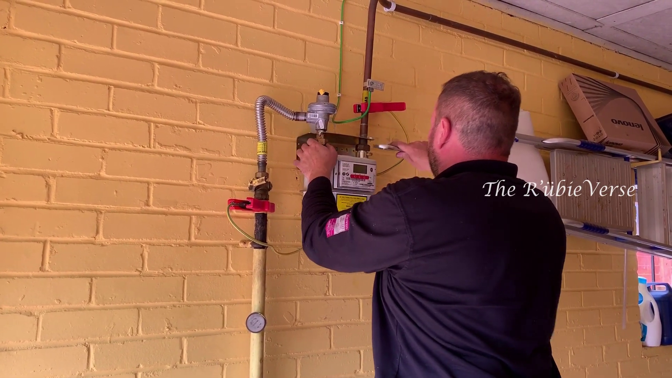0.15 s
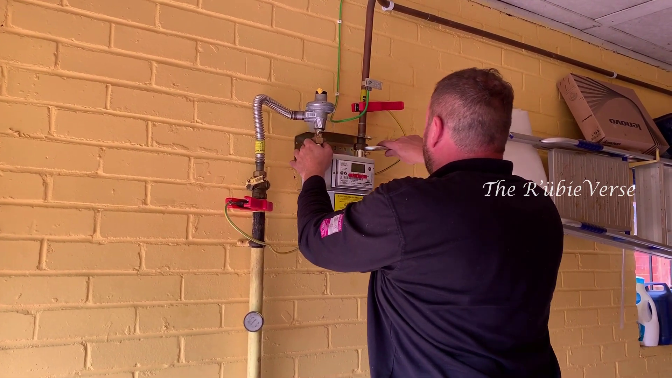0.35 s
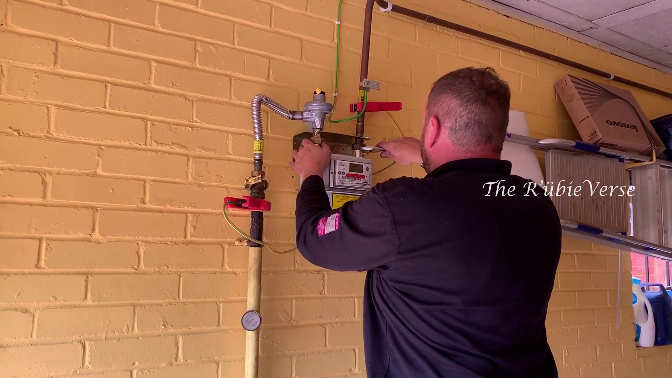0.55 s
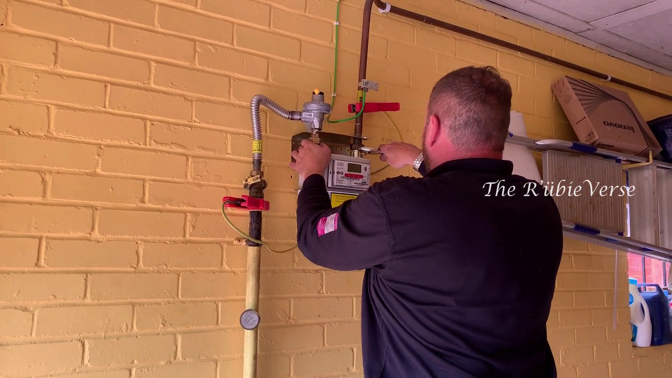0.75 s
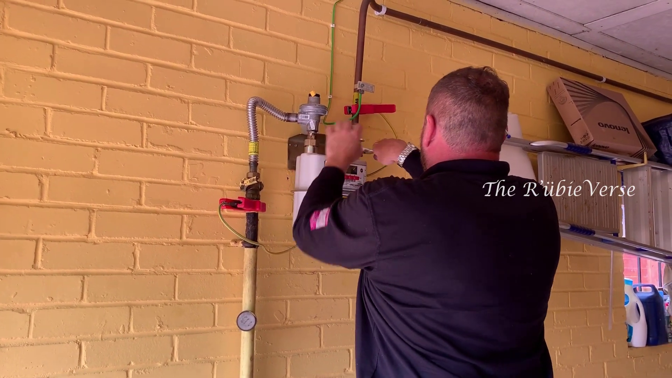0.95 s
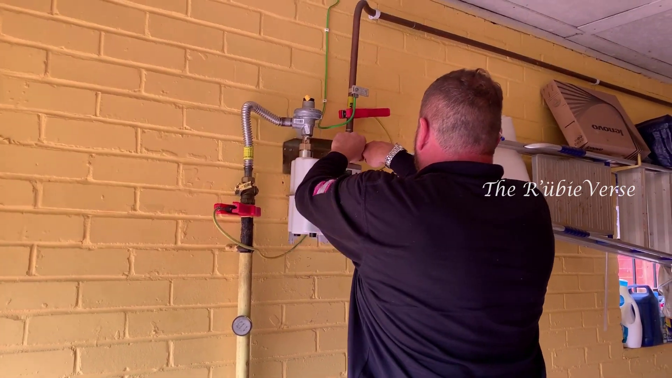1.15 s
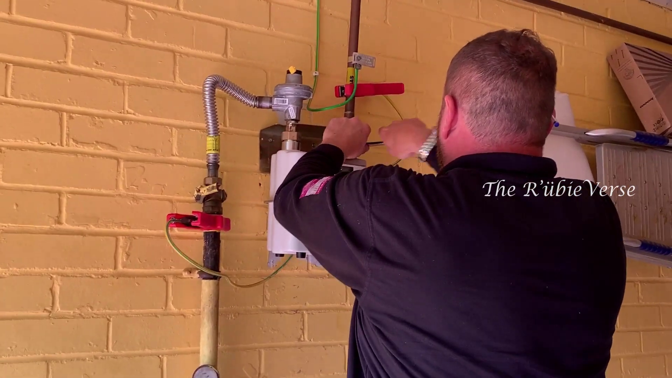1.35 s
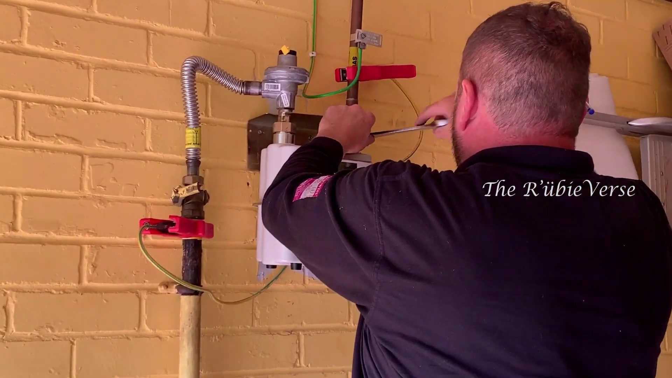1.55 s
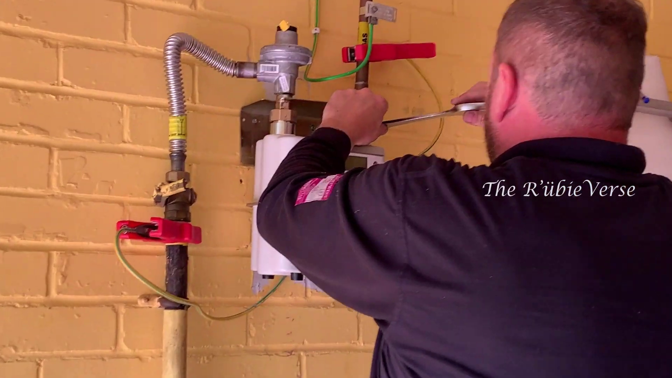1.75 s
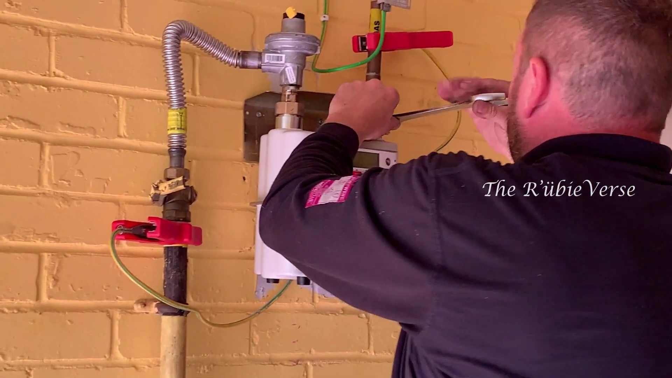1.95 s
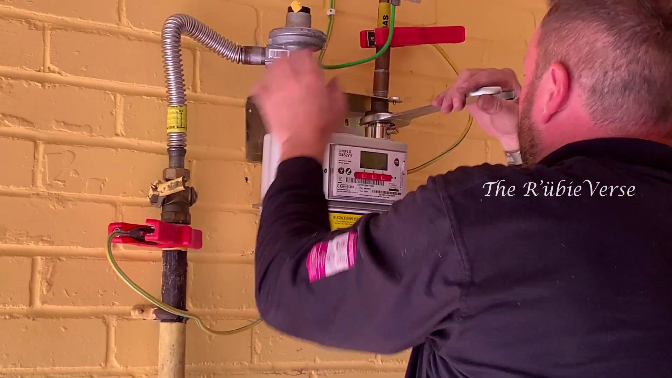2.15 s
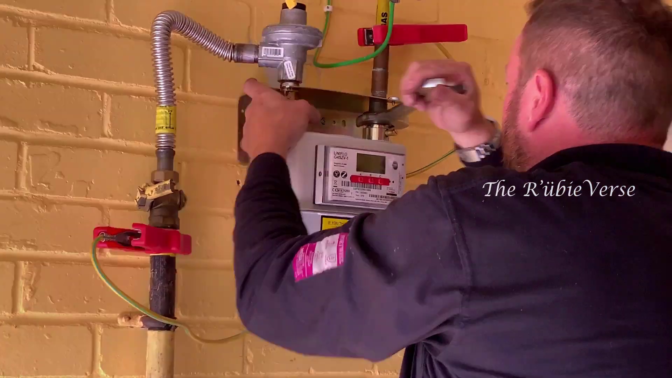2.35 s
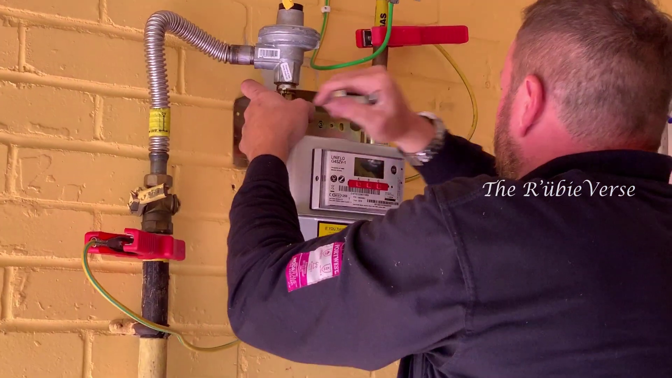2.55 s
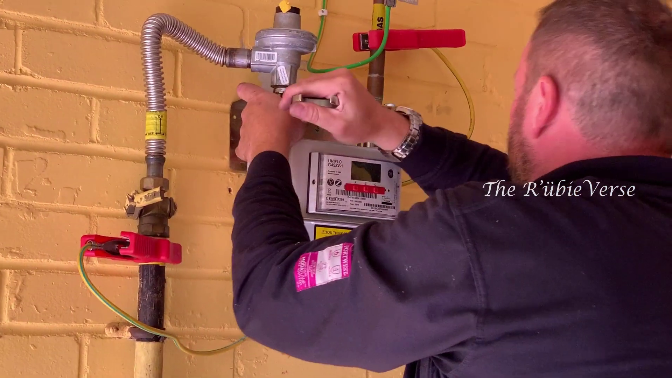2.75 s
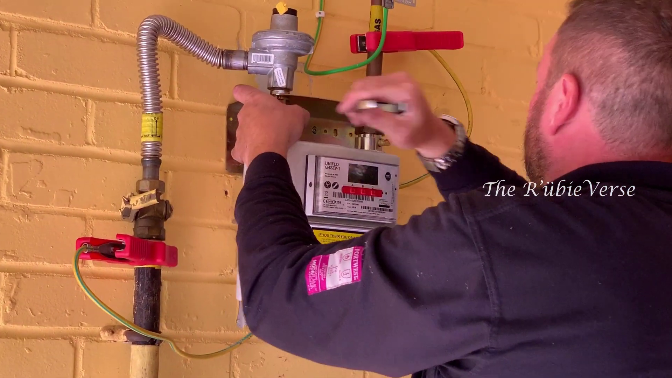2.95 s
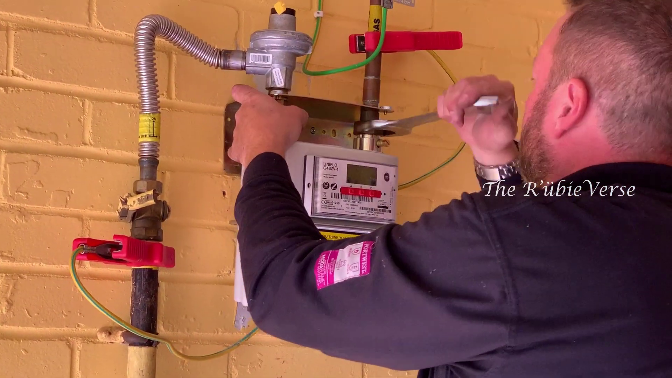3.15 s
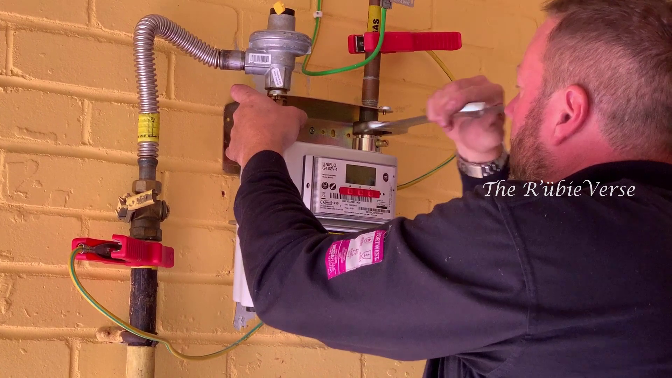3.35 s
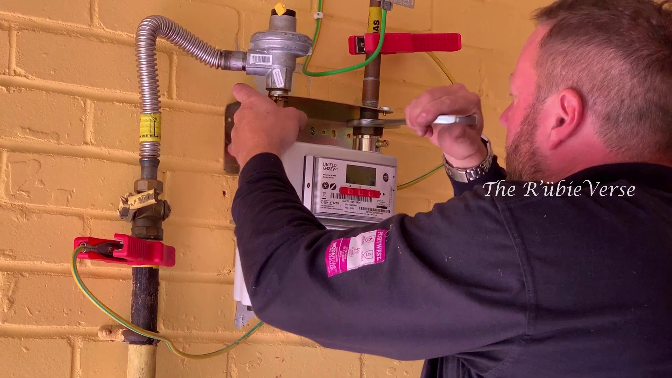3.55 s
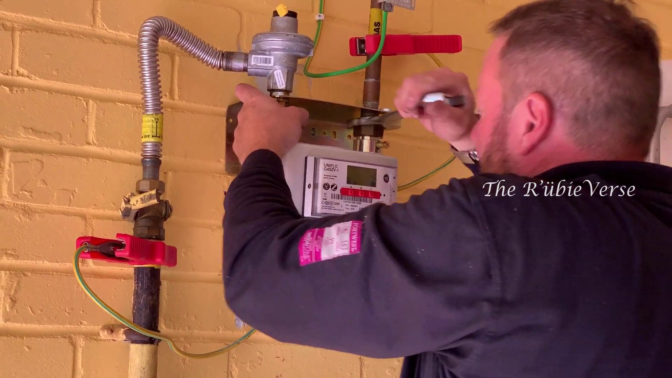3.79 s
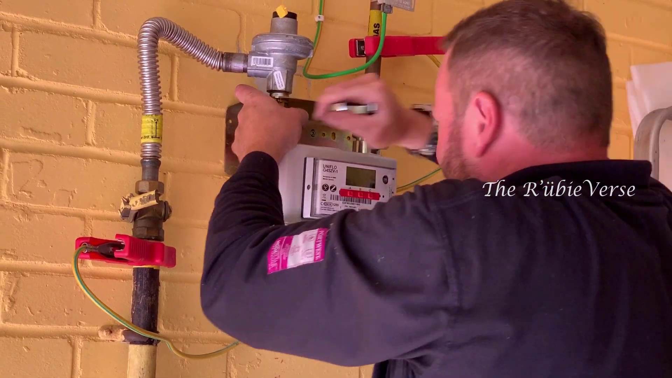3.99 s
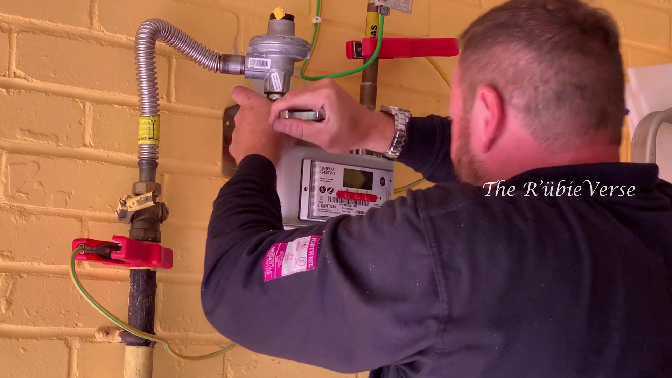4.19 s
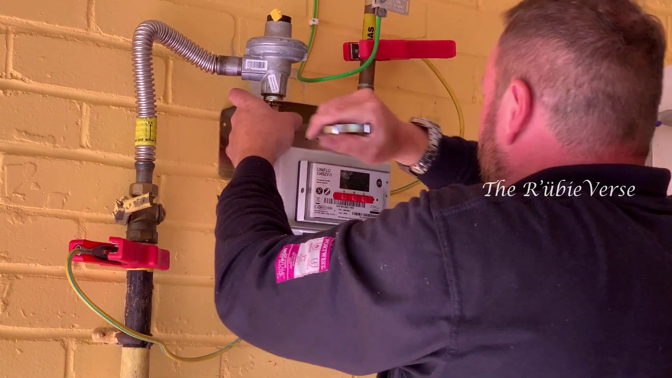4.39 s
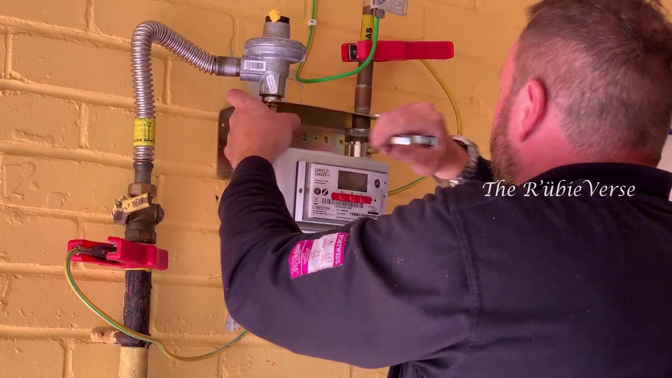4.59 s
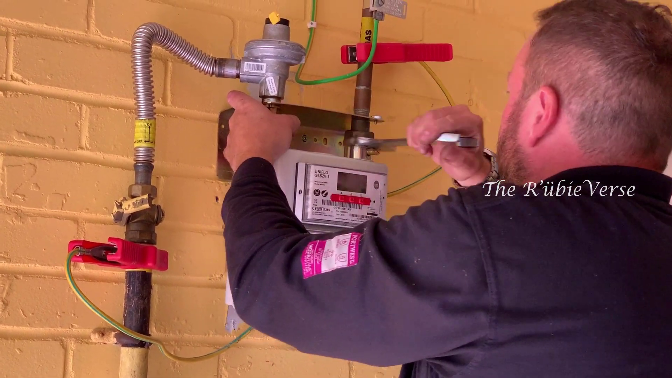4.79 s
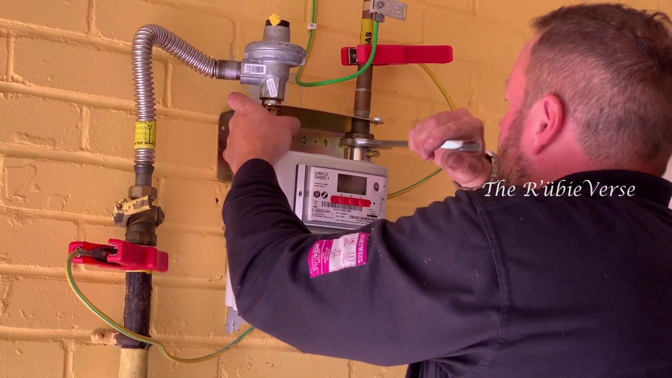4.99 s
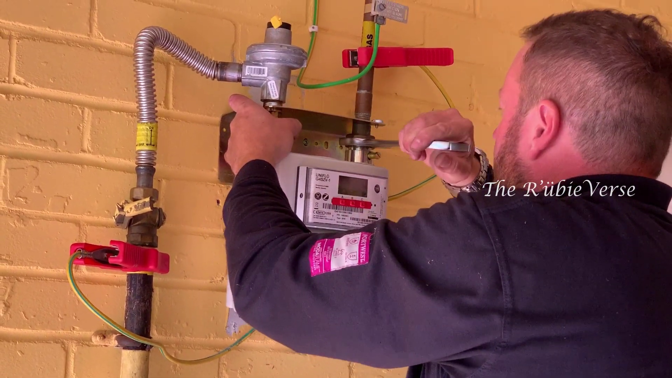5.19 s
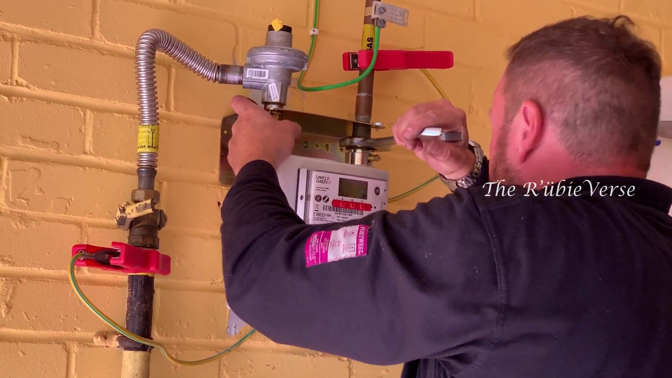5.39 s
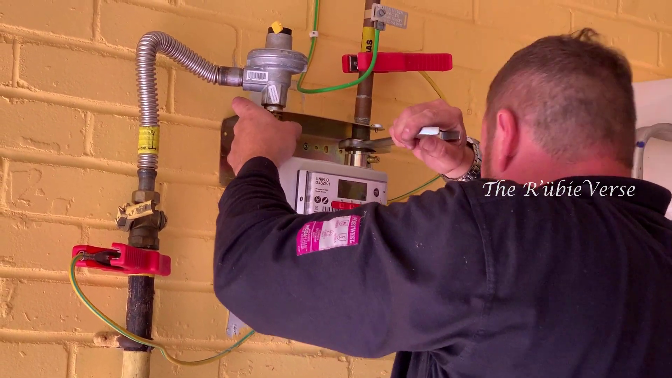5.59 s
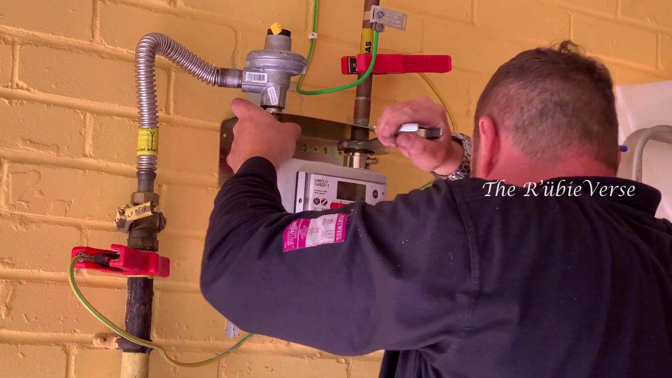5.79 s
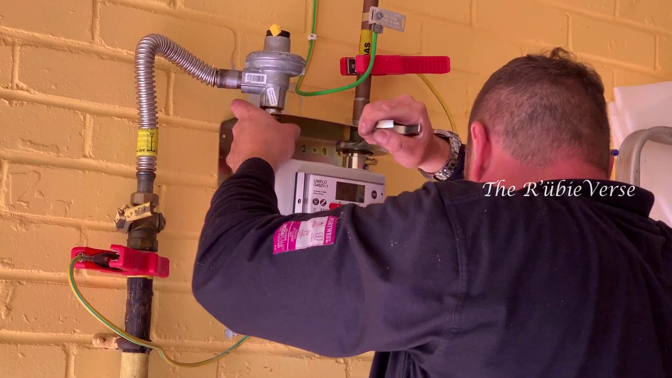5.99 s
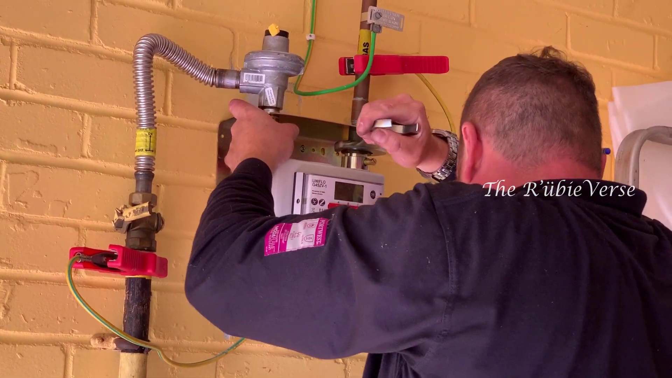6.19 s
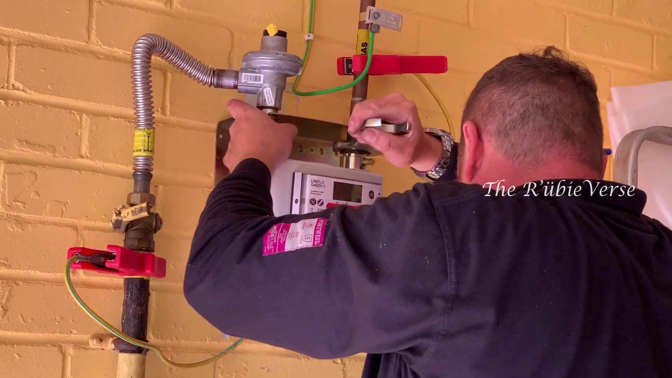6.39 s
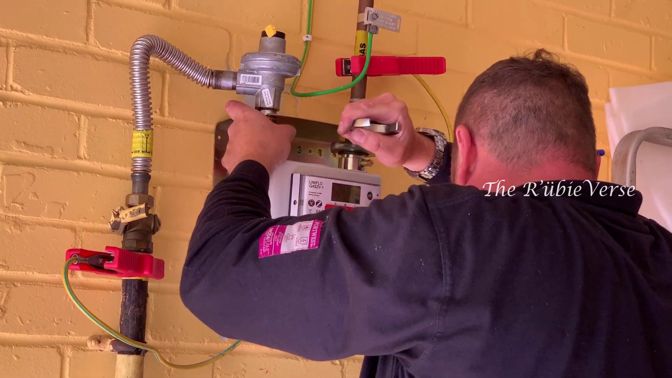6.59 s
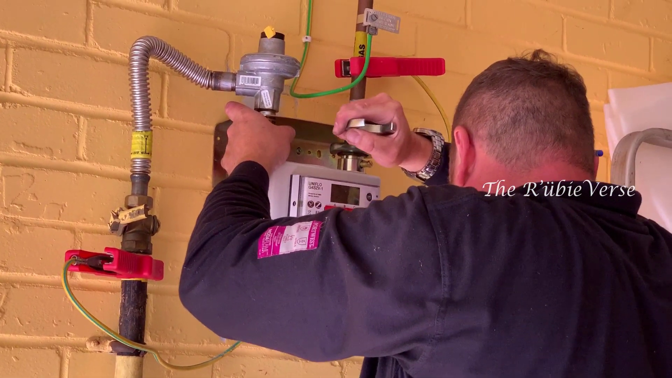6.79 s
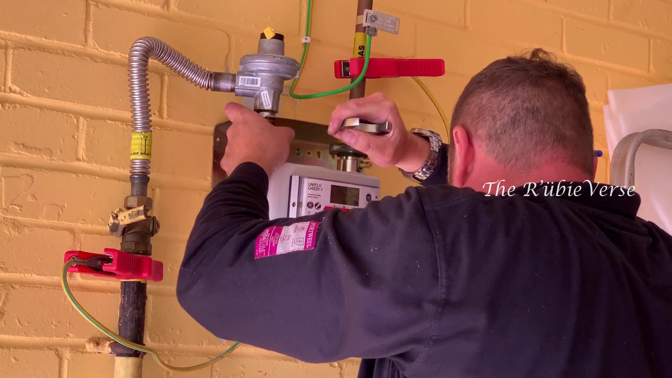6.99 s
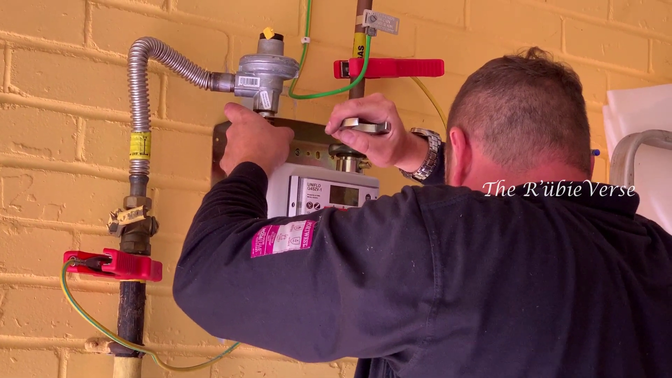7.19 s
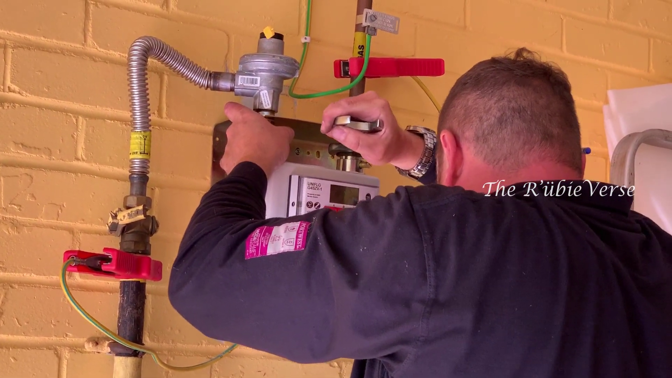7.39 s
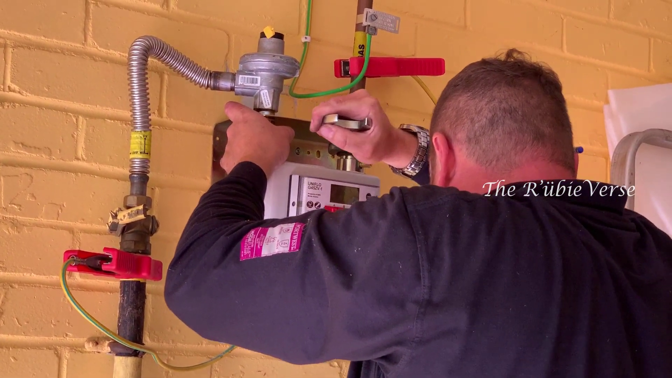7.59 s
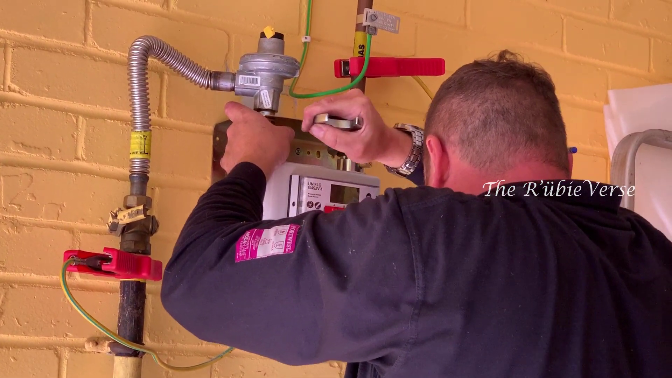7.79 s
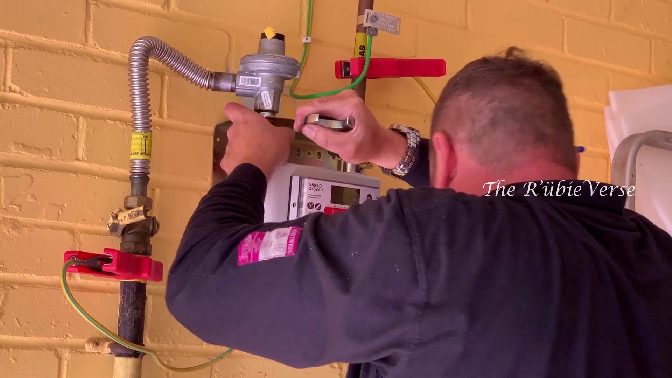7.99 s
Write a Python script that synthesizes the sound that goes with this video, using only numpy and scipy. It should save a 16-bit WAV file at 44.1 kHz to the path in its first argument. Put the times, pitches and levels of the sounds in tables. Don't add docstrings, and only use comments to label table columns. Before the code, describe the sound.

Irregular metal-on-metal knocks ring a hollow sheet-metal case and a gripped steel tool, quickly damped by hands, with short gritty scrapes leading into some blows. Sleeve rustle and soft low rumble fill the pauses. Brick walls return a short, bright echo. The final three seconds are nearly still, with small ticks, hand shifts and thin bird notes, heard through a nearby phone microphone.

```python
import sys
import numpy as np
from scipy import signal
from scipy.fft import rfft, irfft, next_fast_len
from scipy.io import wavfile
from scipy.ndimage import uniform_filter1d, map_coordinates

SR = 44100
rng = np.random.default_rng(int(sys.argv[2]) if len(sys.argv) > 2 else 0)


def bounce(signal):
    frames = np.transpose(np.atleast_2d(signal))
    limited = np.clip(frames, -1, 1)
    pcm = np.round(limited * 32767).astype(np.int16)
    wavfile.write(sys.argv[1], SR, pcm)


def invert_db(x):
    u = np.asarray(x, float) / 20
    return 10 ** u


N = 354563

# pitch_hz, level_db, t60_s
CASE_MODES = [(474, -11, .35), (540, -8, 0.21), (606, -9.5, 0.25), (673, -0.5, 0.37), (745, -0.5, 0.45),
              (810, -3, .4), (857.6, -6.5, 0.68), (906.3, -4, 0.12), (1008, -8, 0.42), (1053, -4, 0.37),
              (1168, -11, 0.11), (1310, -7, 0.34), (1414, -3.5, 0.58), (1746, -15.5, .3)]
# pitch_hz, level_db, t60_s
SPANNER_MODES = [(2350, -9, .15), (2950, -9, .18), (3300, -6, .13), (3850, -11, .18), (4300, -13, .2),
                 (4700, -14, .2), (5900, -17, .2), (6550, -15, .22), (7450, -19, .2), (7950, -16, .18),
                 (8550, -15, .18), (9300, -16, .16), (10400, -21, .16)]
# pitch_hz, level_db, t60_s
PIPE_MODES = [(59, -18, 0.12), (139, 9, 0.042), (248, -1, 0.22), (271.4, -5.5, 0.27), (364.9, -0.5, 0.15)]
# freq_hz, density_db_per_hz
PANEL_CRACK = [(120, -45.5), (220, -6.5), (400, -3), (600, 4.5), (850, -8.5), (1200, -1.5), (1700, -8.5),
               (2500, -25.5), (4000, -40), (6600, -120)]
# freq_hz, density_db_per_hz
CLANG_SPECTRUM = [(1000, -24.5), (1500, -7.5), (2300, -10.5), (3700, -12), (6600, -20), (8500, -14.5),
                  (10400, -17), (11300, -37), (12600, -16.5), (14000, -19.5), (15500, -36)]
# start_s, peak_db, spanner_db re peak, thud_db re peak, case_hz loudest
BLOWS = [(0.362, -8.5, -20.5, -30.5, 658), (0.384, -16.5, -18.5, -40.5, 710),
         (0.438, -14, -12.5, -22, 677), (0.456, -11, -8.5, -23, 520), (0.466, -9.5, -21.5, -19.5, 932),
         (0.487, -16, -29.5, -28.5, 662), (0.502, -25, -32, -27.5, 710),
         (1.013, -27, -16.5, -4.5, 700), (1.144, -5, -15, -23.5, 657), (1.176, -16.5, -23.5, -26, 789),
         (1.234, -17.5, -21.5, -19.5, 745), (1.445, -14.5, -18, -24, 886),
         (1.458, -13.5, -23, -16.5, 640), (1.865, -30, -32, -11, 480), (2.944, -24, -24.5, -12, 880),
         (3.09, -17, -12.5, -23.5, 790), (3.133, -8.5, -12, -13, 901), (3.282, -20, -25.5, -24.5, 660),
         (3.511, -3.5, -10.5, -22.5, 712), (3.52, -5, -18, -21.5, 885), (4.554, -9, -20.5, -20, 743),
         (4.638, -18.5, -14.5, -35, 814), (4.66, -7, -14.5, -27, 808), (4.88, -6, -30.5, -21.5, 685),
         (5.08, -8.5, -30.5, -17, 633)]
# start_s, peak_db, spanner_db re peak, case_hz loudest
MORE_BLOWS = [(0.001, -42, -23.5, 1120), (0.935, -41, -15.5, 660), (1.214, -18.5, -21.5, 760),
              (1.268, -27.5, -21.5, 750), (1.314, -28, -20.5, 830), (1.611, -32.5, -29, 1090),
              (2.103, -44.5, -17, 850), (2.36, -41, -10.5, 967), (2.908, -29, -20, 770),
              (2.936, -32.5, -16.5, 860), (4.654, -19, -11, 828), (4.576, -19.5, -24, 720),
              (3.305, -35, -30.5, 680), (3.44, -31.5, -35.5, 860), (3.461, -28, -27, 715),
              (3.471, -31, -20.5, 816), (4.447, -33, -17, 920), (5.11, -24, -26, 760),
              (5.124, -29, -21.5, 715), (4.562, -11, -25.5, 800), (4.605, -23, -24, 910),
              (4.668, -16.5, -19.5, 900), (4.674, -17.5, -21, 750), (3.163, -17, -20, 885),
              (3.175, -21.5, -22, 740), (3.569, -19, -26, 900), (.394, -25, -25, 698),
              (4.906, -29, -27, 800), (5.364, -44.5, -23, 614)]
# start_s, peak_db, spanner_db re peak, spanner_hz loudest
JAW_TICKS = [(0.639, -53.5, 3, 8000), (0.779, -63, 5, 13000), (0.824, -38.5, -34, 8100),
             (0.849, -40.5, -19, 8940), (2.284, -46, -4.5, 8100), (2.75, -44.5, -0.5, 3630),
             (4.215, -37.5, -31.5, 2390), (4.391, -32.5, 5, 4730), (4.401, -20.5, -4, 2060),
             (4.879, -28, -1, 8970), (5.669, -31, -15.5, 1497), (6.289, -36.5, -24.5, 1935),
             (6.635, -39, -16.5, 1690), (7.472, -37.5, -15, 1680)]
# start_s, length_s, first_db, last_db, spanner_db re case
JAW_RUBS = [(0.812, 0.21, -66.5, -46.5, -11.5), (1.006, 0.098, -31, -38.5, -16.5),
            (1.1, 0.053, -47, -32, -9), (1.424, 0.019, -56, -33, -9), (2.864, 0.083, -54, -31, -12.5),
            (3.416, 0.088, -48, -31, -12.5), (4.331, 0.035, -52, -41.5, -9.5),
            (4.367, 0.038, -43.5, -30.5, 9), (0.338, 0.031, -64.5, -27.5, -9),
            (4.534, 0.02, -59.5, -28, -13), (4.619, 0.029, -35.5, -28, -8), (4.834, 0.039, -51, -33.5, -8),
            (5.069, 0.014, -48, -23, 1)]
# start_s, level_db, pitch_hz, t60_s
SPANNER_TONES = [(0, -68, 1000, 2.5), (0, -62, 5080, .2), (.04, -67, 4250, .3), (2.135, -61, 1420, .25),
                 (2.295, -55, 1030, .12), (2.365, -54, 1030, .16), (2.42, -58, 1030, .14),
                 (1.34, -61, 4740, .9), (.41, -52, 6600, .2), (.933, -55, 6300, .2), (.933, -57, 5200, .2),
                 (.933, -52, 2900, .2), (2.915, -60, 6600, .4), (3.282, -62, 8700, .12),
                 (3.512, -40, 6550, .3), (4.42, -36, 2230, .2), (4.398, -32, 1600, .08),
                 (4.895, -36, 3300, .15), (.362, -33, 2450, .08), (.454, -32, 2500, .07),
                 (.462, -36, 4700, .06), (.476, -32, 2850, .2), (1.012, -52, 3300, .2),
                 (1.447, -58, 4750, .3), (1.5, -56, 3280, .25), (1.447, -47, 3300, .25),
                 (1.78, -76, 4620, .6), (2.87, -60, 1020, .2), (2.936, -40, 2350, .15),
                 (2.942, -35, 1015, .4), (3.09, -29, 3200, .04), (3.133, -23, 3250, .04),
                 (4.554, -22, 3150, .035), (4.655, -23, 3050, .05), (5.08, -30, 3150, .05),
                 (4.636, -36, 2330, .3), (3.135, -30, 2350, .15), (1.065, -53, 2280, .2),
                 (.935, -52, 2250, .25)]
# start_s, level_db, pitch_hz, free_s
PANEL_TONES = [(.378, -19, 673, 0.045), (.38, -23.5, 824.5, 0.02), (.37, -27.5, 1413, 0.0088),
               (.452, -23, 469.6, .03), (.462, -23, 911, 0.044), (.478, -18, 673, 0.032),
               (.535, -28.5, 673, 0.025), (1.03, -34.5, 680, .075), (1.03, -38, 909, 0.059),
               (1.146, -21.5, 680, 0.029), (1.146, -21.5, 811, 0.042), (1.168, -30, 1424, 0.027),
               (1.146, -24.5, 548, 0.039), (1.235, -30.5, 830, 0.053), (1.448, -36, 673, 0.18),
               (1.448, -33.5, 540, .05), (2.945, -38, 248, 0.046), (3.136, -28, 673, 0.027),
               (3.136, -25.5, 837.3, 0.063), (3.136, -26, 1067, 0.047), (3.138, -27.5, 243.5, 0.037),
               (3.514, -21.5, 743.3, 0.031), (3.46, -33.5, 810, 0.029), (3.514, -20.5, 911, 0.057),
               (3.516, -27, 605.4, 0.044), (3.522, -23, 1443, .068), (3.518, -29, 1723, 0.065),
               (4.358, -29.5, 840.4, .135), (4.395, -23, 2224, 0.019), (4.556, -23.5, 736, 0.051),
               (4.556, -26.5, 911.3, 0.041), (4.556, -27.5, 360.8, 0.046), (4.556, -25.5, 1443, 0.056),
               (4.662, -20, 751.4, 0.033), (4.68, -24.5, 682, 0.041), (4.883, -17.5, 805, 0.034),
               (4.885, -22.5, 673, 0.049), (4.882, -26.5, 540, 0.037), (5.082, -24.5, 751.6, 0.029),
               (5.082, -23.5, 609.3, 0.036), (5.084, -30, 1464, 0.057), (5.082, -26.5, 477.6, .04),
               (5.138, -37, 800, 0.0099), (5.15, -36, 599, .06)]
# start_s, length_s, rub_db, hiss_db
SLEEVE_STROKES = [(-.1, 0.11, -61, -70), (.07, 0.066, -75, -69), (0.616, 0.044, -75, -61.5),
                  (.72, 0.24, -75, -71.5), (1.29, 0.18, -61.5, -57), (1.45, 0.3, -89, -85),
                  (1.62, 0.4, -76, -93), (1.85, 0.055, -78, -73), (2.08, 0.038, -67, -72),
                  (2.27, 0.051, -60.5, -62.5), (2.25, 0.41, -64.5, -73.5), (3.17, 0.13, -81, -65),
                  (3.7, 0.49, -69, -74.5), (5.22, 0.27, -69, -73)]
# freq_hz, density_db_per_hz
CLOTH_SPECTRUM = [(1000, -0.5), (1800, -4), (2300, 0), (2800, -9.5), (3700, -2), (4700, -5), (6200, -16),
                  (8000, -54)]
# freq_hz, density_db_per_hz
FIBRE_SPECTRUM = [(3650, -52.5), (6200, -8.5), (8270, -4.5), (10600, -8.5), (11700, -44), (12400, -11),
                  (13500, -2), (15200, -18)]
# start_s, length_s, level_db
PALM_STROKES = [
    (1.87, 0.037, -44.5),
    (6.86, 0.18, -65),
    (7.26, 0.13, -63),
    (7.55, 0.18, -62.5),
    (7.97, 0.11, -68),
    (7.755, 0.03, -57),
]
# freq_hz, density_db_per_hz
PALM_SPECTRUM = [(150, -22), (300, 0.5), (500, 1.5), (780, -7), (1000, -23), (1600, -120)]
# time_s, pitch_hz
BIRD_WHISTLES = [
    [(0, 6930), (.13, 6920), (.23, 6750), (.28, 6500), (.35, 5650)],
    [(1.85, 5900), (1.9, 6800), (2.02, 7200), (2.1, 6600), (2.2, 6260), (2.28, 6600)],
]
# start_s, length_s, first_hz, last_hz, level_db
BIRD_GLIDES = [
    (5.793, 0.11, 5350, 5490, -91),
    (6.74, .03, 4650, 4410, -89),
    (6.923, 0.017, 4470, 4280, -83),
    (6.943, 0.02, 3960, 3680, -69.5),
    (6.966, 0.059, 3360, 3040, -80.5),
    (7.975, 0.063, 5800, 6600, -87),
]
# time_s, level_db
RUMBLE_LEVEL = [(0, -53.5), (.58, -66.5), (.8, -63), (1.17, -42.5), (1.38, -57.5), (2.75, -66.5),
                (3.15, -49.5), (3.4, -46.5), (3.6, -44.5), (4.01, -58.5), (4.66, -53.5), (5.3, -54.5),
                (6.34, -62), (7.37, -55.5), (7.79, -60.5), (8.04, -58.5)]
# freq_hz, density_db_per_hz
RUMBLE_SPECTRUM = [(12, -29), (20, -1.5), (43, 3), (86, -2), (113, -6), (161, -21.5), (220, -12.5),
                   (290, -40), (480, -120)]
# time_s, level_db
TRAFFIC_LEVEL = [(0, -82), (.3, -67.5), (.75, -61.5), (1.75, -60.5), (2.2, -66), (2.65, -65.5), (3.9, -64),
                 (4.15, -63.5), (5.45, -59), (5.9, -62), (6.2, -63), (6.55, -64.5), (7, -65), (7.4, -66),
                 (7.7, -69), (8.04, -69)]
# freq_hz, density_db_per_hz
TRAFFIC_SPECTRUM = [(71, -41.5), (120, -10.5), (226, -6.5), (404, -6.5), (521, -9), (731, -12),
                    (1150, -13.5), (1990, -21), (2320, -29), (3500, -39), (4550, -65.5), (7700, -120)]
# freq_hz, density_db_per_hz
HISS_SPECTRUM = [(900, -34.5), (1500, -10.5), (2300, -17), (3000, -25), (4500, -16.5), (6500, -23.5),
                 (10500, -19), (13500, -23.5), (15500, -52.5)]
# freq_hz, t60_s
WALL_T60 = [(100, 0.93), (260, 0.3), (700, 0.41), (1840, 0.35), (4850, 0.34), (12800, 0.25)]
# freq_hz, likeness_0_to_1
WALL_LIKENESS = [(60, 1), (180, 0.93), (550, 0.29), (1650, 0.11), (4970, 0.17), (15000, 0.8)]
# freq_hz, likeness_0_to_1
AIR_LIKENESS = [(60, .98), (240, .92), (950, .5), (3800, .4), (15000, .5)]
# freq_hz, phase_rad
PORT_PHASE = [(100, 0.15), (500, 0.2), (2000, 1.0), (4000, 1.5), (8000, 1.35), (13000, 1.2)]


def unit(x):
    return x / np.sqrt(np.mean(x ** 2) + 1e-20)


def along(points, hz):
    f, v = np.transpose(points)
    return np.interp(np.log(hz + 1), np.log(f + 1), v)


def curves(rows):
    s, *cols = np.transpose(rows)
    return [np.interp(np.arange(N) / SR, s, c) for c in cols]


def wobble(knots_per_s):
    knots = rng.standard_normal(int(N * knots_per_s / SR) + 4)
    return map_coordinates(knots, [np.arange(N) * knots_per_s / SR])


def wander(t, knots_per_s, knots):
    return map_coordinates(rng.standard_normal((2, knots)), [[[0], [1]] + 0 * t, [knots_per_s * t] * 2],
                           mode="mirror")


def filtered(x, response):
    m = next_fast_len(N + 8192)
    return irfft(rfft(x, m) * response(np.fft.rfftfreq(m, 1 / SR)), m)[..., :N]


def paired(z, hz, likeness):
    turn = np.arccos(np.clip(along(likeness, hz), -1, 1))[:, None] / 2
    mid = np.cos(turn) * z[..., 0, :, :]
    side = np.sin(turn) * z[..., 1, :, :]
    return np.stack([mid + side, mid - side], axis=-3)


def rush(spectrum, patchy_db):
    hz, _, z = signal.stft(rng.standard_normal((2, N)), SR, nperseg=1024)
    field = uniform_filter1d(rng.standard_normal(z.shape[1:]), size=8, axis=0)
    field = uniform_filter1d(field, size=5, axis=1)
    z = paired(z, hz, AIR_LIKENESS) * invert_db(patchy_db * unit(field))
    patchy = signal.istft(z, SR, nperseg=1024)[1][:, :N]
    return unit(filtered(patchy, lambda f: invert_db(along(spectrum, f))))


def tails(count):
    hz, t, z = signal.stft(rng.standard_normal((count, 2, SR // 2)), SR, nperseg=256)
    z = paired(z, hz, WALL_LIKENESS) * invert_db(-60 * t / along(WALL_T60, hz)[:, None])
    tail = signal.istft(z, SR, nperseg=256)[1]
    tail_s = np.arange(tail.shape[-1]) / SR
    tail *= 1 - np.exp(-tail_s / 0.00063)
    tail *= invert_db(3.2 * (tail_s < 0.07))
    return tail / np.sqrt(np.sum(tail ** 2, axis=(1, 2), keepdims=True) / 2)


def street():
    rumble = invert_db(curves(RUMBLE_LEVEL)[0] + 0.38 * wobble(2.4)) * rush(RUMBLE_SPECTRUM, patchy_db=0.9)
    traffic = invert_db(curves(TRAFFIC_LEVEL)[0] + 0.48 * wobble(2.7)) * rush(TRAFFIC_SPECTRUM, patchy_db=3.5)
    hiss = invert_db(-81.5) * rush(HISS_SPECTRUM, patchy_db=0.8)
    return rumble + traffic + hiss


def strokes(rows):
    swell_share, fade_s = 0.39, 0.14
    t = np.arange(N) / SR
    s, length, *dbs = np.transpose(rows)[:, :, None]
    swell = (t - s) / (swell_share * length)
    fade = 1 + (s + length - t) / fade_s
    shape = np.clip(np.minimum(swell, fade), 0, 1) ** 2
    return [np.sum(invert_db(db) * shape, axis=0) for db in dbs]


def sleeve():
    rub, hiss = strokes(SLEEVE_STROKES)
    palm, = strokes(PALM_STROKES)
    rustle = rub * rush(CLOTH_SPECTRUM, patchy_db=3.5)
    rustle = rustle + hiss * rush(FIBRE_SPECTRUM, patchy_db=2.5)
    rustle = rustle + palm * rush(PALM_SPECTRUM, patchy_db=-5.0)
    return invert_db(1.5 * wobble(30)) * rustle


def singing():
    out, t = np.zeros(N + SR), np.arange(SR) / SR
    for s, db, hz, t60_s in SPANNER_TONES:
        grip = wander(t, knots_per_s=55, knots=44)
        tone = np.sin(2 * np.pi * hz * t + 1.6 * grip[0])
        envelope = invert_db(db - 60 * t / t60_s + 1.8 * grip[1]) * (1 - np.exp(-t / 0.0015))
        out[round(s * SR):][:SR] += envelope * tone
    return out[:N]


def sounding(rows, fade_s):
    t = np.arange(N) / SR
    return np.clip(np.minimum(t - rows[0][0], rows[-1][0] - t) / fade_s + 0.5, 0, 1)


def bird_note(rows, flutter):
    hz, db = curves(rows)
    phase = 2 * np.pi * np.cumsum(hz * flutter) / SR
    return invert_db(db + 3.0) * sounding(rows, fade_s=0.01) * np.sin(phase)


def birds():
    out = np.zeros(N)
    for rows, db, change_db in zip(BIRD_WHISTLES, [-72, -79], [-10.5, 0]):
        first_s, last_s = rows[0][0], rows[-1][0]
        whistle = [(s, hz, db + change_db * (s - first_s) / (last_s - first_s)) for s, hz in rows]
        out += bird_note(whistle, flutter=1)
    flutter = 1 + 0.015 * wobble(450)
    for s, length_s, first_hz, last_hz, db in BIRD_GLIDES:
        out += bird_note([(s, first_hz, db), (s + length_s, last_hz, db)], flutter)
    return invert_db(1.8 * wobble(31)) * out


def ring(modes, t, loudest_hz, focus_db, damping, scatter_db, detune, spot_db=0):
    hz, db, t60_s = np.transpose(modes + [(loudest_hz, spot_db, 0.2)])[:, :, None]
    hz = hz * (1 + detune * rng.standard_normal(hz.shape))
    db = db + scatter_db * rng.standard_normal(db.shape)
    db = db - focus_db * np.abs(np.log2(hz / loudest_hz))
    tones = np.sin(2 * np.pi * (hz * t + rng.random(hz.shape)))
    x = np.sum(invert_db(db - 60 * t / (damping * t60_s)) * tones, axis=0)
    x *= 1 - np.exp(-(t / 0.0011) ** 2)
    return x / np.max(np.abs(x))


def burst(spectrum, t, t60_s, centre_hz, focus_db):
    hz = np.fft.rfftfreq(len(t), 1 / SR) + 1
    colour = invert_db(along(spectrum, hz) - focus_db * np.abs(np.log2(hz / centre_hz)))
    noise = unit(irfft(rfft(rng.standard_normal(len(t))) * colour, len(t)))
    return noise * invert_db(-60 * t / t60_s) * (1 - np.exp(-t / (0.026 * t60_s)))


def contacts():
    jaw_hz, tip_case_hz = 2410, 781
    with_thud = [(*row, jaw_hz) for row in BLOWS]
    thud_by_rule = [(*row, jaw_hz) for row in MORE_BLOWS]
    thud_by_rule += [(s, db, steel_db, tip_case_hz, steel_hz) for s, db, steel_db, steel_hz in JAW_TICKS]
    return with_thud + [(s, db, steel_db, -27.5 - 0.55 * steel_db, case_hz, steel_hz)
                   for s, db, steel_db, case_hz, steel_hz in thud_by_rule]


def knocks():
    case_grip, steel_grip = 0.24, 0.075
    out, t = np.zeros((2, N + SR)), np.arange(SR // 4) / SR
    touches = contacts()
    for (s, db, steel_db, thud_db, case_hz, steel_hz), tail in zip(touches, tails(len(touches))):
        case = ring(CASE_MODES, t, case_hz, focus_db=13.0, damping=case_grip, scatter_db=4.0,
                    detune=0.004, spot_db=-4.5)
        case = case + invert_db(-2) * burst(PANEL_CRACK, t, t60_s=0.049, centre_hz=case_hz, focus_db=2.5)
        push = burst(PANEL_CRACK, t, t60_s=0.012, centre_hz=case_hz, focus_db=1.5)
        case = case + invert_db(1.0) * push
        steel = ring(SPANNER_MODES, t, steel_hz, focus_db=4.5, damping=steel_grip, scatter_db=4.0,
                     detune=0.0067, spot_db=-6)
        steel = steel + invert_db(-0.5) * burst(CLANG_SPECTRUM, t, t60_s=0.042, centre_hz=steel_hz, focus_db=5.0)
        first_touch = burst(CLANG_SPECTRUM, t, t60_s=0.0043, centre_hz=4000, focus_db=-5.0)
        steel = steel + invert_db(-4.5) * first_touch
        thud = ring(PIPE_MODES, t, 243, focus_db=0.0, damping=0.9, scatter_db=1.0, detune=0.0035)
        dry = invert_db(db - 8.5) * (case + invert_db(steel_db + 8.0) * steel + invert_db(thud_db + 6.5) * thud)
        wet = invert_db(2.0) * signal.fftconvolve(dry[None], tail, axes=1)
        balance_db = rng.normal(0, 0.4) * np.array([[1], [-1]])
        wet[:, :len(t)] += dry * invert_db(balance_db)
        out[:, round(s * SR):][:, :wet.shape[1]] += wet
    return out[:, :N]


def rubs():
    out, t = np.zeros((2, N + 2 * SR)), np.arange(SR // 8) / SR
    slip_on = rng.random(N) < 3500 / SR
    slips = unit(slip_on * rng.standard_normal(N) * invert_db(0.54 * rng.exponential(size=N)))
    slips = slips * invert_db(1.2 * wobble(40))
    for (s, length_s, first_db, last_db, steel_db), tail in zip(JAW_RUBS, tails(len(JAW_RUBS))):
        case = ring(CASE_MODES, t, 800, focus_db=10.5, damping=0.091, scatter_db=-5.0, detune=0.022)
        steel = ring(SPANNER_MODES, t, 2300, focus_db=8.5, damping=0.056, scatter_db=-6.5,
                     detune=0.03, spot_db=-6)
        grit = burst(CLANG_SPECTRUM, t, t60_s=0.019, centre_hz=2600, focus_db=8.0)
        body = case + invert_db(steel_db) * (steel + invert_db(-1.5) * grit)
        start = round(s * SR)
        share = np.arange(SR // 2) / (SR * length_s)
        pressure = invert_db(first_db + (last_db - first_db) * share) * (share < 1) * np.clip(share / 0.51, 0, 1)
        force = slips[start - SR // 4:][:SR // 2] * pressure
        dry = signal.fftconvolve(force, body / np.linalg.norm(body))
        wet = invert_db(1.5) * signal.fftconvolve(dry[None], tail, axes=1)
        wet[:, :len(dry)] += dry
        out[:, start:][:, :wet.shape[1]] += wet
    return out[:, :N]


def panels():
    free_t60_s, stopped_t60_s = 0.51, 0.049
    out, t = np.zeros(N + SR), np.arange(SR // 4) / SR
    for s, db, hz, free_s in PANEL_TONES:
        flex = wander(t, knots_per_s=60, knots=20)
        fall_db = 60 * (t / free_t60_s + np.maximum(t - free_s, 0) / stopped_t60_s)
        envelope = invert_db(db - fall_db + 1.5 * flex[1]) * (1 - np.exp(-t / 0.0033))
        out[round(s * SR):][:len(t)] += envelope * np.sin(2 * np.pi * hz * t + 0.45 * flex[0])
    return out[:N]


def scene():
    tones = singing() + panels() + birds()
    echo = signal.fftconvolve(tones[None], tails(1)[0], axes=1)[:, :N]
    work = knocks() + rubs() + tones + invert_db(-11) * echo
    sides = np.array([[1], [-1]])
    work = filtered(work, lambda hz: np.exp(0.5j * along(PORT_PHASE, hz) * sides))
    return work + sleeve() + street()


def starved(x, keep_db):
    edge_hz, gap_hz, top_hz = 10800, 12200, 14600
    hz, _, z = signal.stft(x, SR, nperseg=2048)
    f = hz[:, None]
    power = np.mean(np.abs(z) ** 2, axis=0)
    frames, band = np.arange(z.shape[-1]), np.arange(len(hz)) // 12
    luck = rng.random((band[-1] + 1, len(frames)))[band][:, frames // 2]
    need_db = keep_db + 11 * (f < gap_hz) + 5 * np.maximum(f - top_hz, 0) / 1000
    strong = (uniform_filter1d(power, size=13, axis=0) > invert_db(need_db) ** 2) & (luck < 0.6)
    treble = power[(hz > edge_hz / 2) & (hz < edge_hz)].mean(axis=0)
    calm = treble < 1.7 * np.percentile(treble, 10)
    quiet = calm & (f > 11800) & (f < 12400) & (luck < 0.75)
    stray = (f > 12700) & (f < 14300) & (luck < 0.08)
    keep = (f < edge_hz + 800 * (luck - 0.6)) | strong | quiet | stray
    return signal.istft(z * keep, SR, nperseg=2048)[1][:, :N]


def low_pass(x):
    return signal.sosfilt(signal.butter(12, 15800, fs=SR, output="sos"), x)


def record(dry):
    mix = starved(dry, keep_db=-97)
    return low_pass(mix)


dry = scene()
out = record(dry)
bounce(out)
```